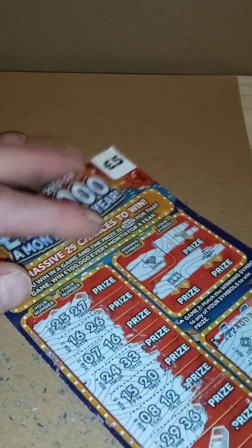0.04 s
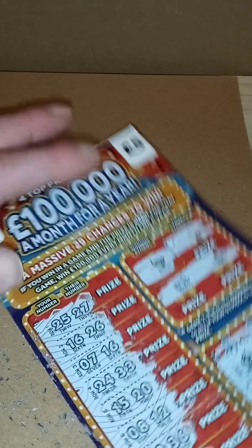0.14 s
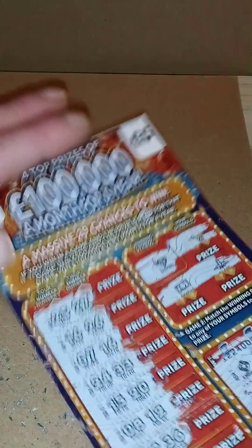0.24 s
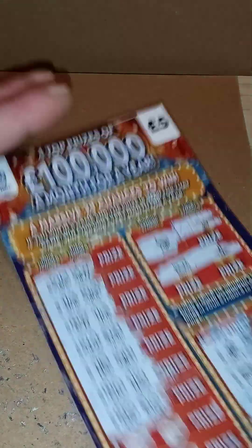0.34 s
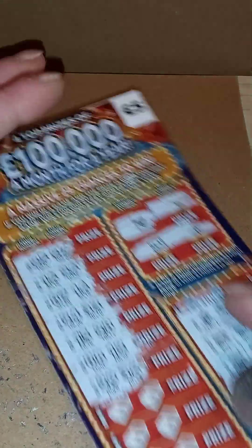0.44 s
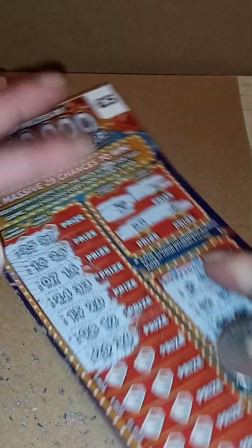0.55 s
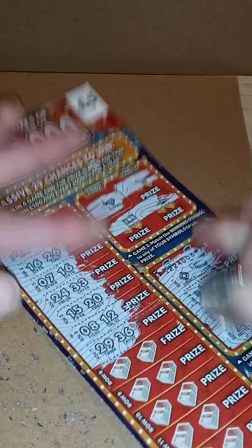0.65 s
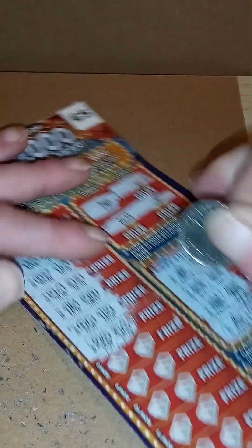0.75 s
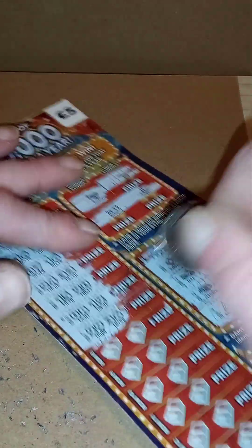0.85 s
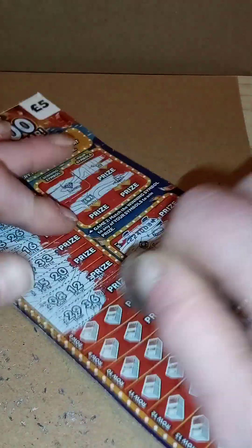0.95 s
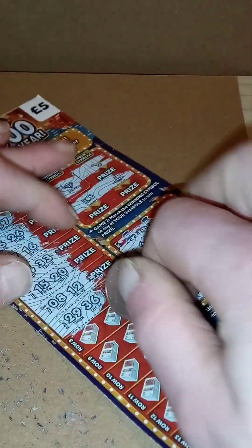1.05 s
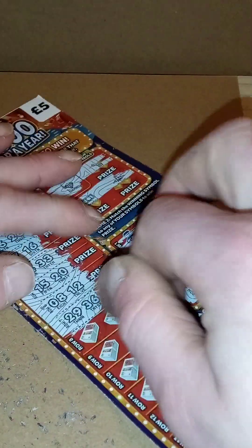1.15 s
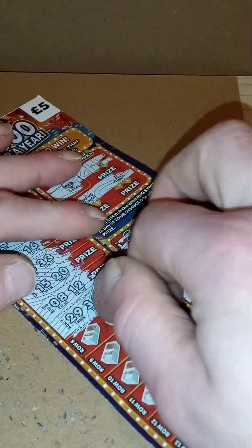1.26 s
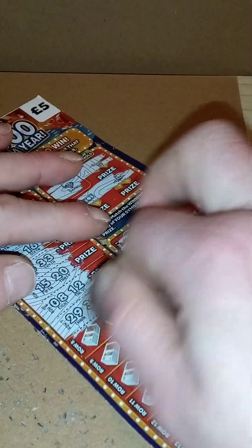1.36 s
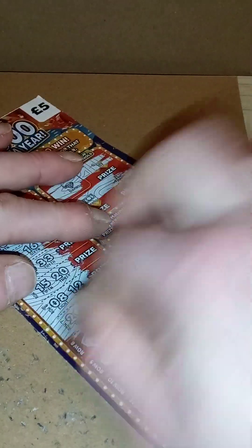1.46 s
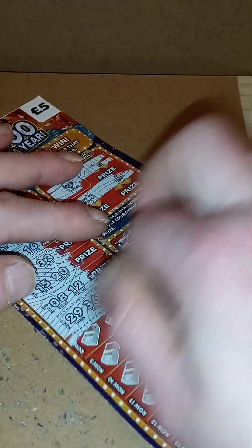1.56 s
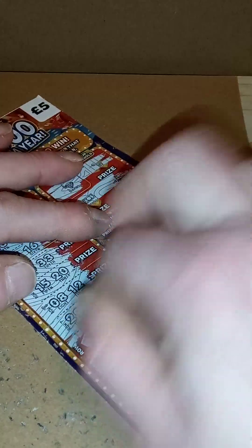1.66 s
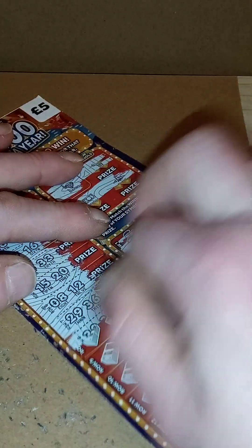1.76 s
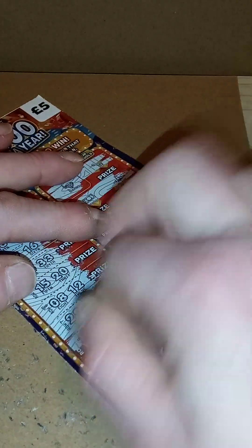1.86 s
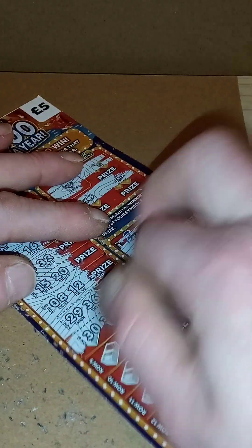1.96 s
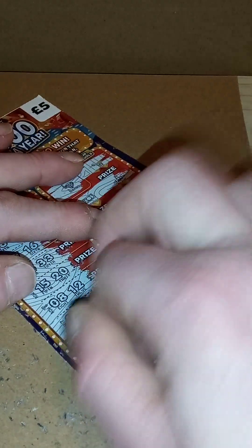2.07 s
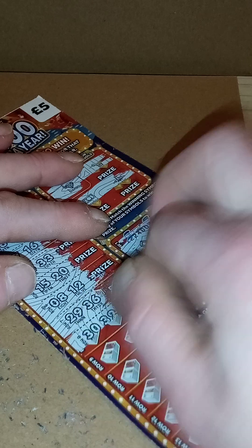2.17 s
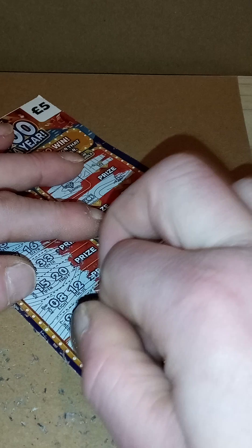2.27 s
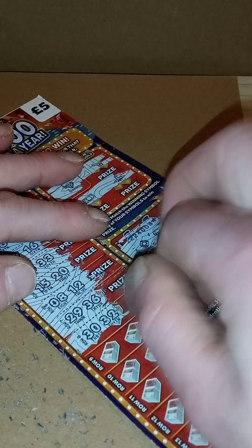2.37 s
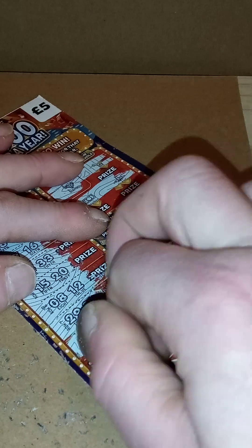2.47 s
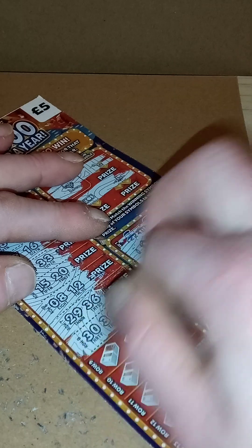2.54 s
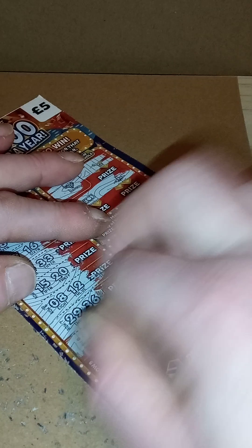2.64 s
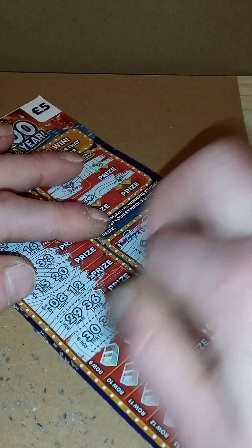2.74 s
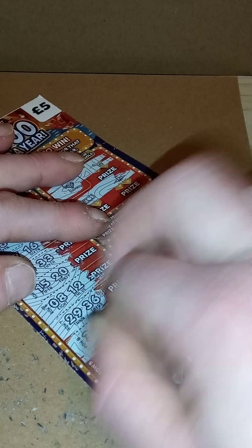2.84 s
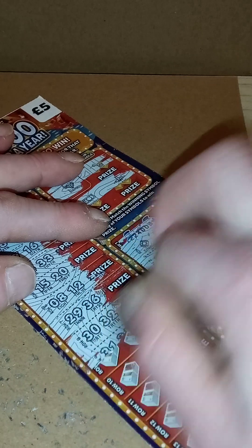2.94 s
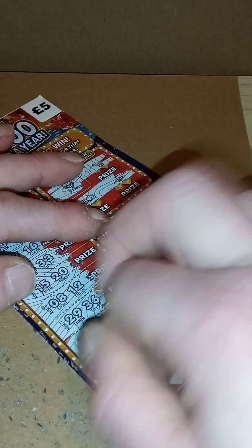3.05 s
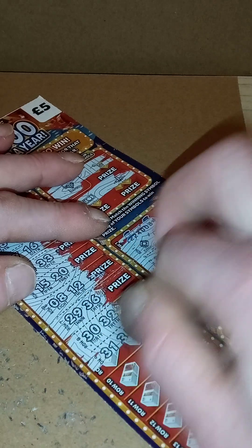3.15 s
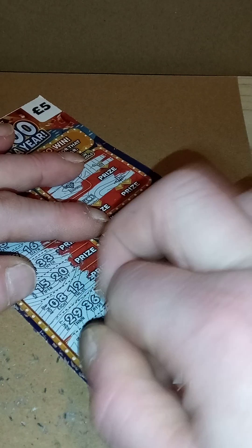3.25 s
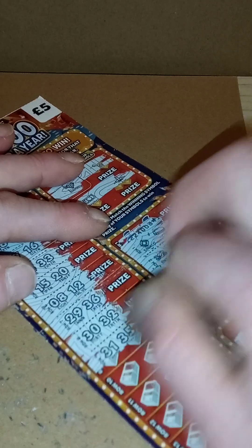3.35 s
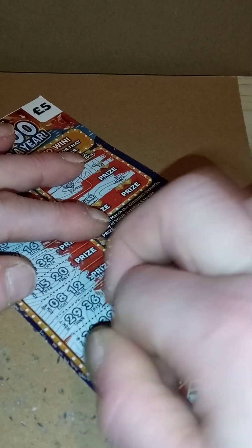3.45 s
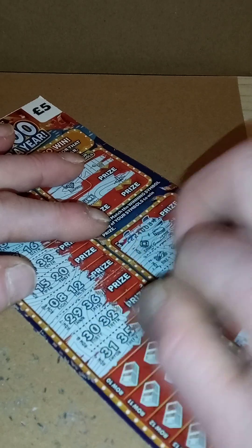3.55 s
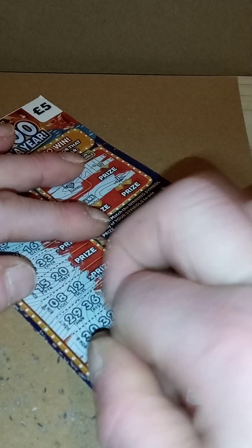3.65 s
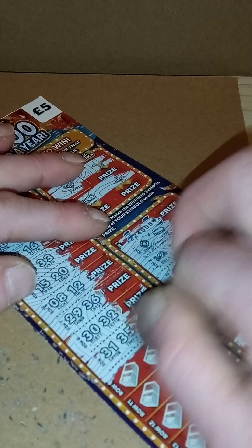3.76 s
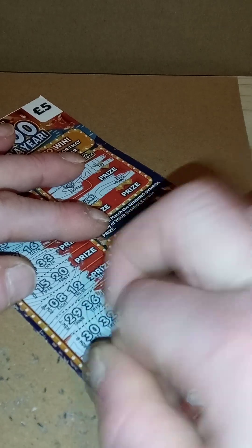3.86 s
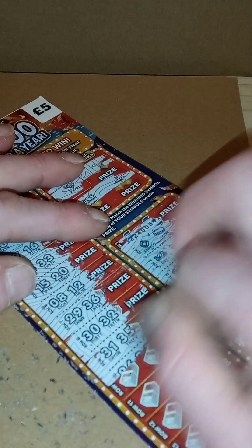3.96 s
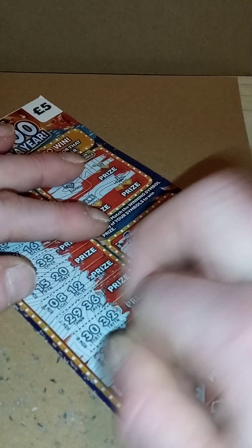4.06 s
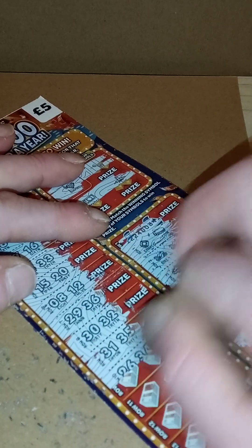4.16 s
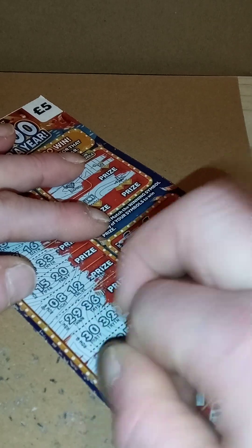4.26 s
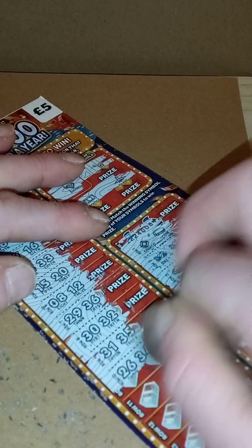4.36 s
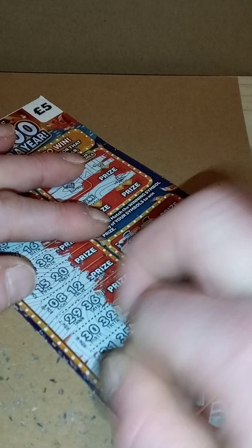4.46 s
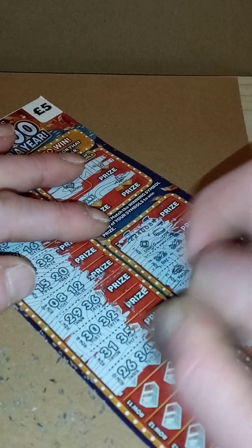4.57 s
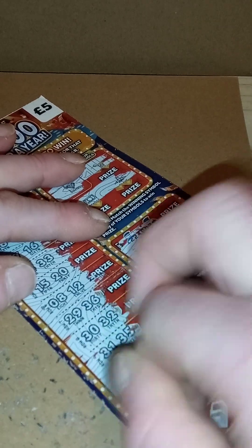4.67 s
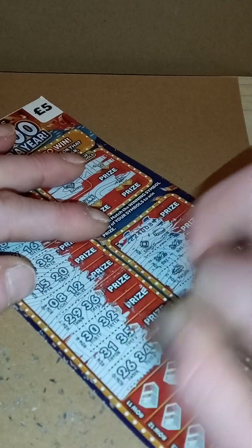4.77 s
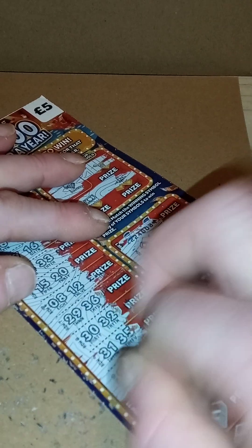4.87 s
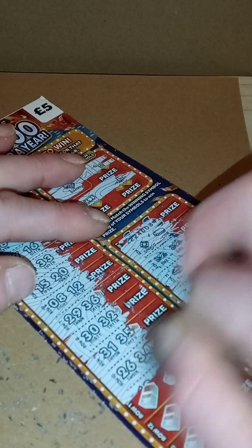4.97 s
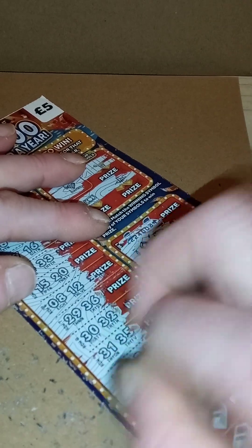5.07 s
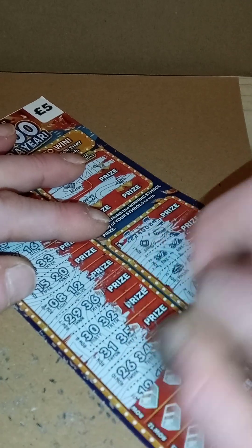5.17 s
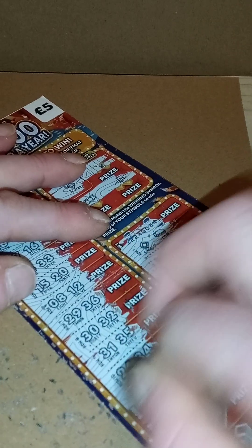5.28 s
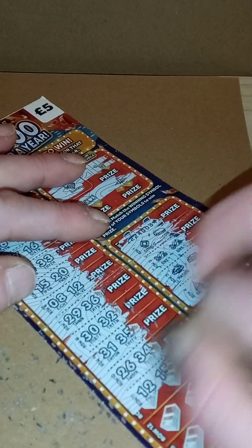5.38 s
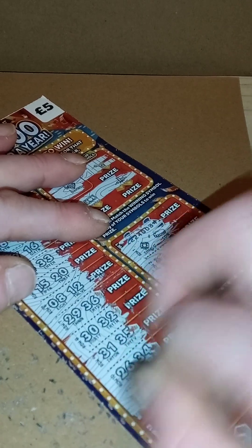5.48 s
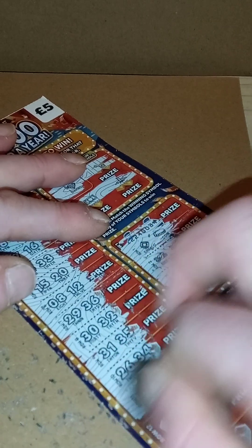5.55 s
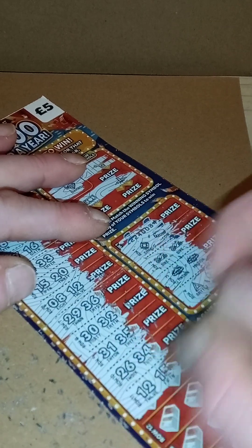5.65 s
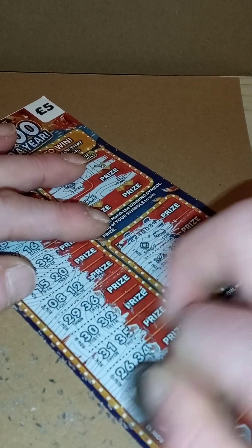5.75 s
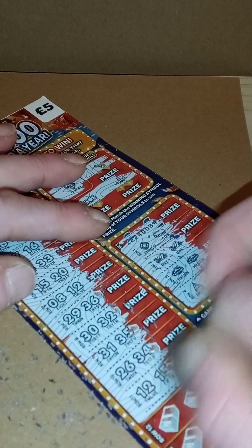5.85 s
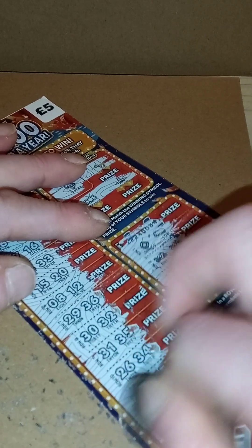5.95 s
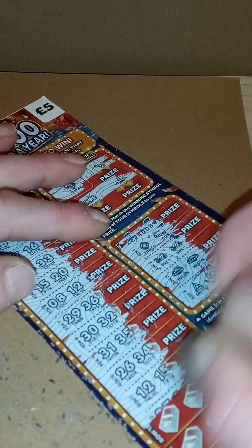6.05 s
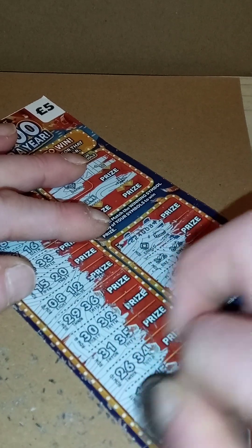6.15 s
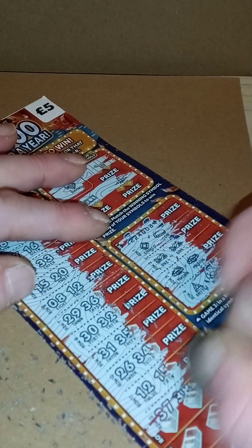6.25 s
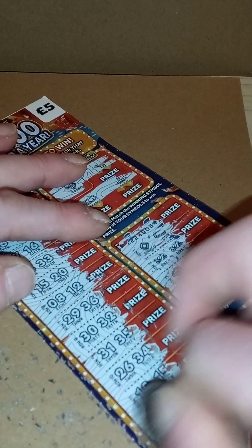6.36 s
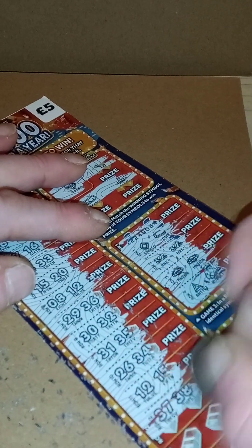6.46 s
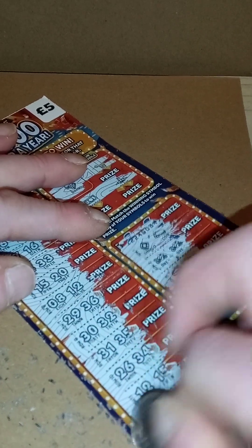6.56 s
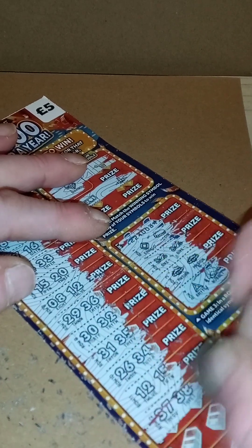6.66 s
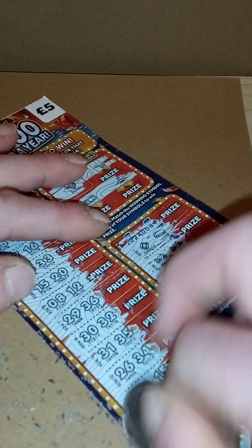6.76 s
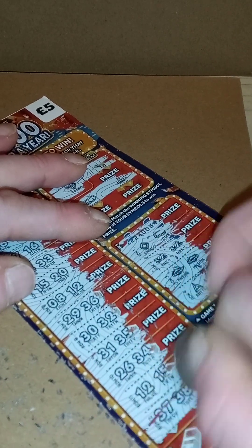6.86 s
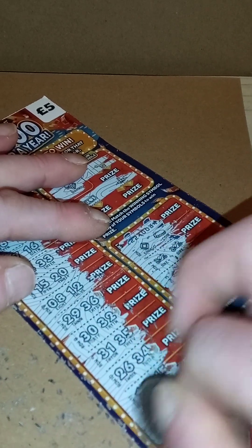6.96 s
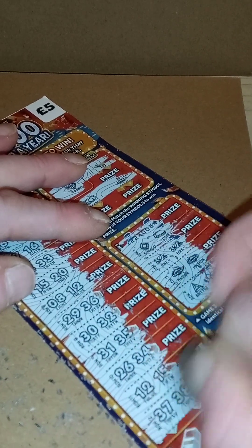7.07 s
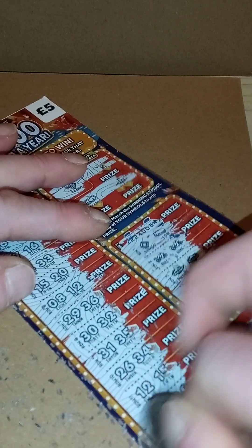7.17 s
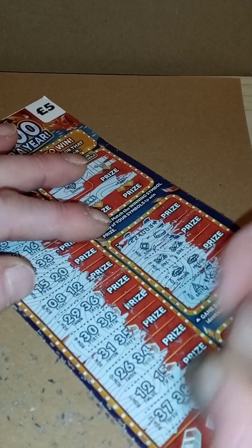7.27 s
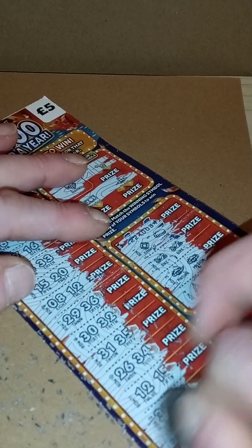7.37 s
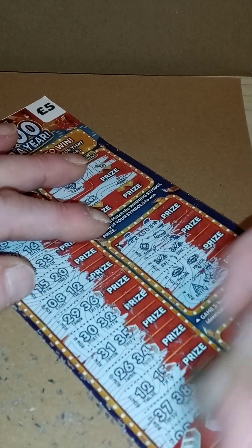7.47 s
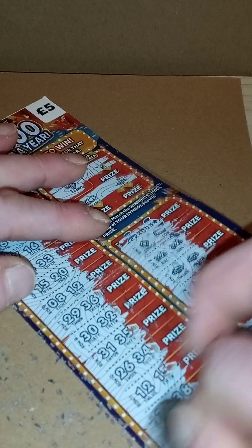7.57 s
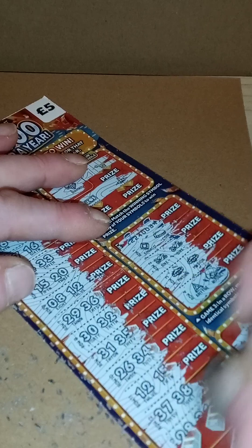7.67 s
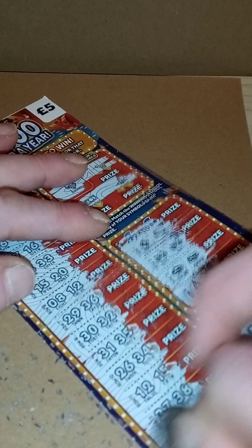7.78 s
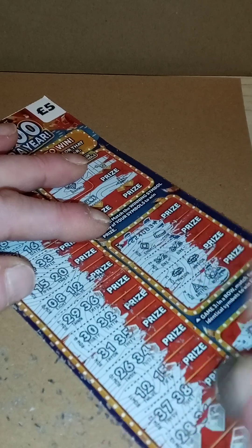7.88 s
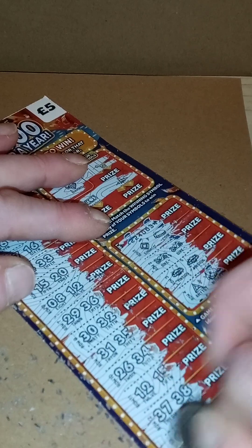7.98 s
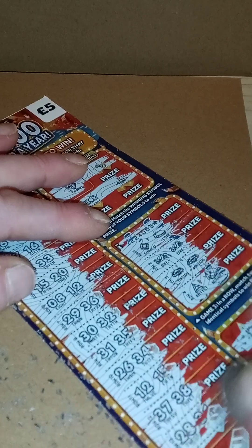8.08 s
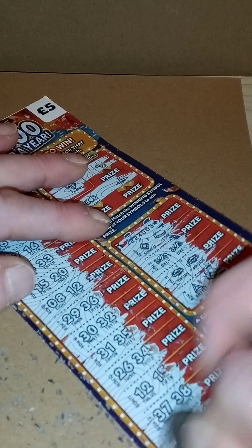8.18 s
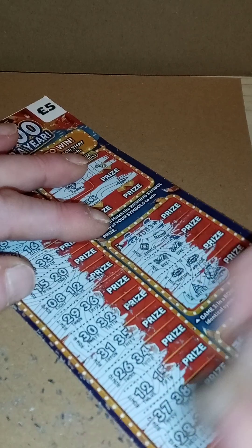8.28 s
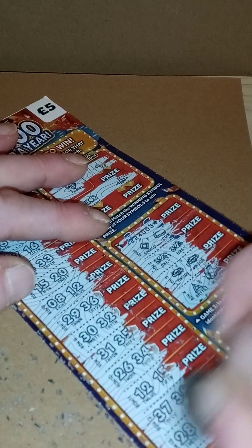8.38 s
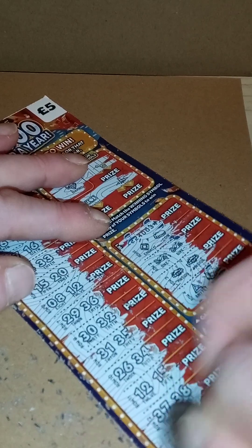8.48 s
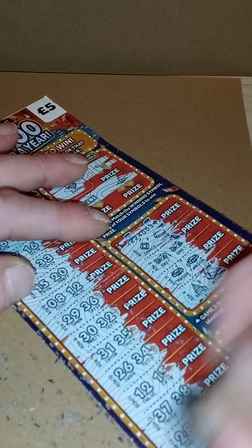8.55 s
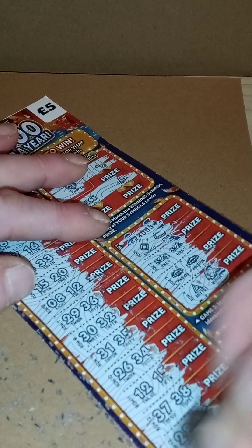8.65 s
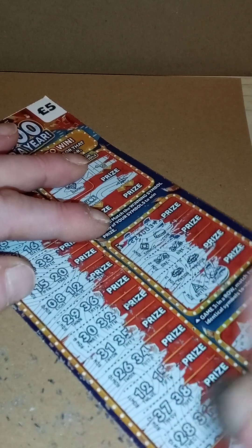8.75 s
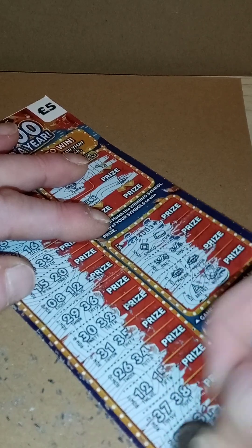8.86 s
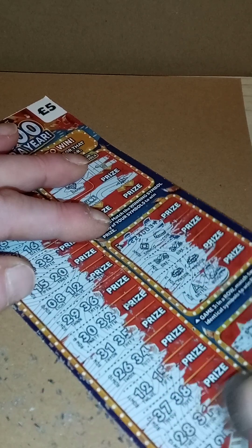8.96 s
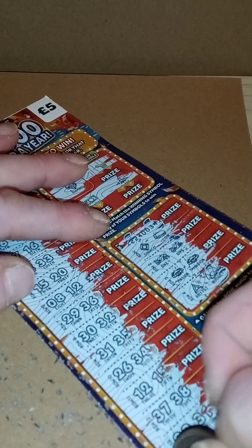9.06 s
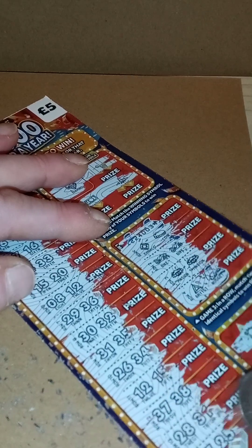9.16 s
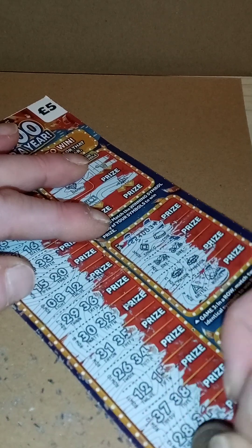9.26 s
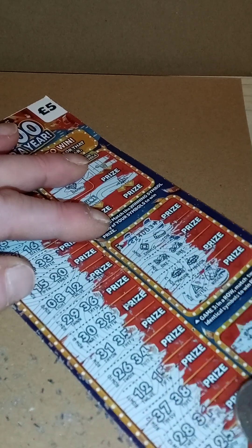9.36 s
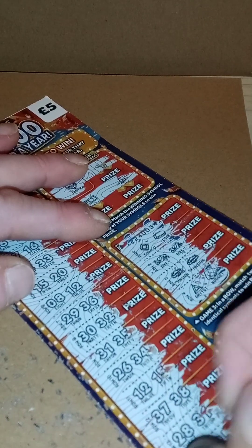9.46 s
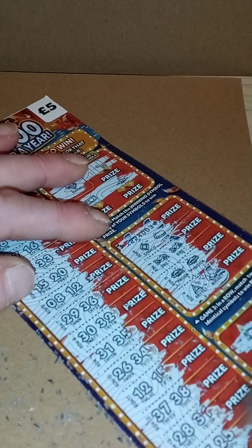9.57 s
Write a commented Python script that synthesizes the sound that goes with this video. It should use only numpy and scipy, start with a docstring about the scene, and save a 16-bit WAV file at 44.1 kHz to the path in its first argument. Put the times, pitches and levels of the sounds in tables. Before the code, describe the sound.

Close up in a small, fairly dry room, a thin card is moved on a sheet of cardboard. A short swish opens the scene, then dry ticks at about 0.2 to 0.4 s and a longer soft papery slide from 0.4 to 0.8 s, with dull low hand bumps; quieter shuffles and small clicks follow until 1.3 s. From 1.4 s a coin scrapes the card's coating in quick alternating strokes, about ten a second, each a short gritty rasp, back and out differing slightly in tone. The hand's jolts make the cardboard thud softly, with stronger hollow thumps and coin knocks near 4.0, 4.6, 5.2 and 6.0 s. The scratching weakens briefly around 7 s, then grows louder and rougher from 7.5 s, with more knocks and ticks, still going when it stops at about 9.6 s. Faint rumble and steady hush lie beneath.

```python
"""Small room, close microphone: a coin scrapes the coating off a thin card lying on a cardboard sheet.
The card is first slid about: shaped noise, with deep bumps as hands shift on the board.
Then quick strokes go to and fro: gritty noise through card resonances, rubbing in the board modes.
The hand jolts the board's low modes; the coin edge knocks on it; dry ticks come from card and coin.
Low rumble and a steady hush lie beneath."""
import sys
import numpy as np
from scipy import signal
from scipy.fft import rfft, irfft
from scipy.io import wavfile

SR = 44100
rng = np.random.default_rng(int(sys.argv[2]) if len(sys.argv) > 2 else 0)


def bounce(signal):
    """Save signal as a 16-bit WAV file at the path given by the first command-line argument."""
    frames = np.transpose(np.atleast_2d(signal))
    limited = np.clip(frames, -1, 1)
    pcm = np.round(limited * 32767).astype(np.int16)
    wavfile.write(sys.argv[1], SR, pcm)


N = 424228


def from_db(db):
    """Decibels to amplitude gain."""
    return 10 ** (np.asarray(db) / 20)


def rms_one(x):
    """Scale to rms 1."""
    return x / np.sqrt(np.mean(x ** 2) + 1e-20)


def in_time(rows):
    """Interpolate each column of a time curve to one value per sample."""
    t_s, *columns = np.transpose(rows)
    return [np.interp(np.arange(N) / SR, t_s, column) for column in columns]


def drift(rate_hz):
    """Slow random wander of rms 1: noise through a double one-pole lowpass."""
    r = np.exp(-2 * np.pi * rate_hz / SR)
    noise = rng.standard_normal(N + SR)
    settled = signal.lfilter([1], [1, -2 * r, r * r], noise)[SR:]
    return rms_one(settled)


def ring(force, hz, t60_s):
    """Two-pole mode: a unit click starts a decaying sine of initial height 1."""
    r = from_db(-60 / (t60_s * SR))
    w = 2 * np.pi * hz / SR
    return signal.lfilter([0, np.sin(w)], [1, -2 * r * np.cos(w), r * r], force + 1e-18)


def resonance(x, hz, width_hz):
    """Two-pole bandpass with a peak gain of about 1."""
    r = np.exp(-np.pi * width_hz / SR)
    zeros = np.array([1, 0, -1]) * (1 - r * r) / 2
    return signal.lfilter(zeros, [1, -2 * r * np.cos(2 * np.pi * hz / SR), r * r], x)


def coloured(x, points):
    """Impose a spectrum of (f/Hz, level/dB) points, then scale to rms 1."""
    hz = np.maximum(np.fft.rfftfreq(N, 1 / SR), 1)
    point_hz, point_db = np.array(points).T
    shape_db = np.interp(np.log(hz), np.log(point_hz), point_db)
    return rms_one(irfft(rfft(x) * from_db(shape_db), N))


def grit(per_s, spread_db, smooth):
    """Tiny tears: dense clicks of uneven size over smooth friction noise, rms 1."""
    sizes = from_db(spread_db * np.minimum(rng.exponential(1, N), 5)) * rng.choice([-1, 1], N)
    clicks = rms_one(sizes * (rng.random(N) < per_s / SR))
    return rms_one(clicks + smooth * rng.standard_normal(N))


def sweep(t_s, length_s, peak, softness, release):
    """First sample and shape of a movement that speeds up to its peak and slows to a halt."""
    at = round(t_s * SR)
    progress = np.linspace(0, 1, round(length_s * SR))
    phase = np.interp(progress, [0, np.clip(peak, .08, .92), 1], [0, np.pi / 2, np.pi])
    roundness = np.where(phase < np.pi / 2, max(softness, .05), release)
    return at, (np.abs(np.sin(phase)) ** roundness)[:N - at]


# coin strokes, back and out in turn, back first: t/s, length/s, relative level/dB
STROKE_TABLE = [(1.414, 0.039, -52.5), (1.494, 0.043, -44.5), (1.552, 0.054, -48), (1.654, 0.071, -46.5),
                (1.756, 0.056, -48.5), (1.862, 0.069, -47.5), (1.953, .057, -48), (2.058, 0.044, -43.5),
                (2.148, 0.058, -57), (2.258, 0.054, -47.5), (2.334, 0.055, -48), (2.439, 0.052, -44.5),
                (2.532, 0.055, -48.5), (2.638, 0.054, -45.5), (2.726, 0.058, -48), (2.838, 0.07, -44.5),
                (2.935, 0.049, -45.5), (3.039, 0.065, -44.5), (3.125, 0.051, -47), (3.235, 0.067, -46),
                (3.323, 0.051, -52.5), (3.438, .069, -47), (3.524, 0.054, -48.5), (3.641, 0.06, -44.5),
                (3.723, .049, -45.5), (3.839, 0.06, -45.5), (3.925, 0.052, -50), (4.038, 0.071, -45),
                (4.142, 0.055, -48.5), (4.253, 0.059, -49.5), (4.337, .048, -49.5), (4.449, 0.063, -48),
                (4.542, 0.065, -57.5), (4.646, 0.071, -45.5), (4.735, 0.063, -50), (4.86, 0.06, -47),
                (4.946, .056, -48.5), (5.069, 0.057, -46), (5.148, 0.054, -48), (5.257, 0.065, -48.5),
                (5.352, 0.062, -51.5), (5.471, 0.063, -45.5), (5.561, 0.063, -50.5), (5.679, 0.061, -45),
                (5.771, 0.048, -47), (5.885, 0.062, -46), (5.975, 0.051, -48.5), (6.083, 0.063, -47.5),
                (6.178, 0.063, -51), (6.296, .062, -44), (6.381, 0.06, -51.5), (6.495, 0.071, -45.5),
                (6.589, 0.06, -50.5), (6.701, 0.066, -46), (6.791, 0.058, -49.5), (6.867, 0.097, -53),
                (6.994, 0.058, -52.5), (7.098, 0.079, -55.5), (7.199, 0.058, -57), (7.3, 0.062, -46),
                (7.384, 0.068, -47.5), (7.494, 0.063, -44.5), (7.583, 0.056, -45.5), (7.703, 0.055, -46.5),
                (7.793, 0.061, -43.5), (7.896, 0.067, -43.5), (8.002, 0.066, -43), (8.117, 0.061, -41),
                (8.204, 0.056, -43), (8.315, 0.053, -42.5), (8.395, 0.048, -48), (8.494, 0.065, -47),
                (8.576, 0.052, -51.5), (8.665, 0.07, -45.5), (8.754, 0.044, -41), (8.847, .048, -47),
                (8.93, 0.049, -41.5), (9.036, 0.057, -41.5), (9.12, 0.051, -40), (9.227, 0.06, -40.5),
                (9.315, 0.065, -39.5), (9.422, 0.057, -41), (9.51, 0.064, -38.5), (9.606, 0.012, -41.5)]
# back, out: speed peak (0-1), start softness, stop softness (exponents), board weight/dB, dullness/dB
STROKE_DIRECTIONS = [(.4, 0.59, 0.69, -52.5, -3), (.62, 0.61, 0.47, -60, 3)]
# coin position along the card: t/s, place (0 middle, 1 free end)
COIN_PLACE = [(0, 0.36), (1.4, 0.16), (4, 0.052), (6.8, 0.067), (7.6, 0.32), (8.6, 0.67), (9.6, 0.64)]
# how hard the hand bears down: t/s, change of board weight/dB
HAND_BEARING = [(1.4, -4), (2.2, 1.5), (3.1, -1), (3.7, -1.5), (4.6, 1), (5.2, 0), (6.1, 1.5), (6.9, 0.5),
                (7.4, 1), (7.9, 3), (8.5, -0.5), (9.1, 0.5), (9.6, -4)]
PEAK_SPREAD, WEIGHT_SPREAD_DB, DULL_SPREAD_DB = 0.14, 1.64, 1.7  # stroke to stroke
BACK_DULLS_DB = 7  # times place: back strokes dull toward the free end
WEIGHT_LAG_S = 0.0071


def strokes(edge):
    """Coin pressure on card and board, and dullness; each stroke is widened by edge at both ends."""
    on_card, on_board, dull_db = np.zeros((3, N))
    place, = in_time(COIN_PLACE)
    chances = rng.standard_normal((len(STROKE_TABLE), 3))
    for k, ((t_s, length_s, level_db), chance) in enumerate(zip(STROKE_TABLE, chances)):
        peak, softness, release, weight_db, dullness_db = STROKE_DIRECTIONS[k % 2]
        peak = peak + PEAK_SPREAD * chance[0]
        at, shape = sweep(t_s - edge * length_s, length_s * (1 + 2 * edge), peak, softness, release)
        on_card[at:at + len(shape)] += from_db(level_db) * shape
        on_board[at:at + len(shape)] += from_db(weight_db + WEIGHT_SPREAD_DB * chance[1]) * shape
        dull_db[at:] = dullness_db + DULL_SPREAD_DB * chance[2]
        if k % 2 == 0:
            dull_db[at:] += BACK_DULLS_DB * place[at]
    # the hand's weight reaches the board a little after the coin bites
    r = np.exp(-1 / (WEIGHT_LAG_S * SR))
    bearing_db, = in_time(HAND_BEARING)
    return on_card, signal.lfilter([1 - r], [1, -r], on_board * from_db(bearing_db)), dull_db


# card resonances: f/Hz, width/Hz, relative level at middle/dB, at end/dB, dullness response (dB per dB)
CARD_RESONANCES = [(1356, 92, -12, -18, 0.72), (1650, 187, -11, -9, .5), (1970, 77, -13, -8, 0.83),
                   (2337, 257, -3.5, -6.5, -0.51), (2700, 150, -5.5, 5, -0.86),
                   (3050, 496, -5.5, -9.5, -0.52), (4094, 300, -4, -1.1, -0.8),
                   (4890, 460, -0.5, -9.5, -1.3), (5410, 515, 0, -13, -1.28), (6415, 586, -5, -7.5, -0.7),
                   (6446, 280, -7.5, -8, -0.53), (8480, 1200, -1, -8.5, -0.82)]


def card(pressure, dull_db):
    """Torn coating excites the card's resonances, each flickering on its own."""
    force = pressure * from_db(2.62 * drift(35)) * grit(per_s=5000, spread_db=3, smooth=1)
    place, = in_time(COIN_PLACE)
    out = np.zeros(N)
    for k, (hz, width_hz, middle_db, end_db, response) in enumerate(CARD_RESONANCES):
        # a flatter coin favours the low resonances
        level_db = middle_db + (end_db - middle_db) * place + response * dull_db
        level_db = level_db + 1.75 * drift(27)
        out += (-1) ** k * from_db(level_db) * resonance(force, hz, width_hz)
    return from_db(13) * out


# cardboard modes, low to high: f/Hz, relative level/dB, t60/s (free of the hand)
BOARD_MODES = [(118.2, -4.5, 0.18), (221.7, -2, 0.19), (320.4, -15.5, 0.12), (394, -16, 0.042),
               (539.6, -9.5, 0.11), (660, -16.5, 0.013), (815, 3, 0.04), (918, 1, 0.03), (1045, 6, 0.026),
               (1131, -2.5, 0.021), (1414, -9, 0.044), (1614, -9, 0.057), (1918, -6, 0.033),
               (2225, -3, 0.031), (3100, -13.5, 0.008)]
# coin edge on board: t/s, relative level/dB, contact/ms (rise to greatest force, at least 0.02)
COIN_KNOCKS = [(.333, -25.5, 0.5), (1.6, -30.5, .11), (2.193, -35, 0.1), (2.399, -28.5, 0.13),
               (3.9904, -11, 0.13), (4.601, -15, 0.016), (5.219, -13.5, .14), (6.04, -18, 0.1),
               (6.662, -16, 0.18), (6.866, -17, 0.15), (7.652, -14.5, 0.026), (7.858, -15, .04),
               (8.022, -25, 0.077), (8.223, -24.5, 0.4), (8.764, -12, 0.32), (8.951, -17, 0.4),
               (9.146, -15, 0.28), (9.359, -15.5, 0.45)]
CRACK_DB, KNOCK_SPREAD_DB = -25, 2.5


def board(pressure):
    """Rubbing and knocks ring the cardboard modes; each knock adds a short noise crack."""
    rub = from_db(-27.5) * pressure * from_db(3.4 * drift(45))
    rub = rub * grit(per_s=1500, spread_db=2.5, smooth=0.71)
    knocks, cracks = np.zeros((2, N))
    time_s = np.arange(400) / SR
    noises = rng.standard_normal((len(COIN_KNOCKS), 400))
    for (t_s, level_db, contact_ms), noise in zip(COIN_KNOCKS, noises):
        at = round(t_s * SR)
        blow = time_s * np.exp(-1000 * time_s / max(contact_ms, .02))
        knocks[at:][:400] -= from_db(level_db - 18) * blow / blow.sum()
        cracks[at:][:400] += from_db(level_db + CRACK_DB) * noise * np.exp(-time_s / 0.0018)
    # a light coin hardly moves the two bending modes of the whole sheet
    knock_shares = [from_db(-21), from_db(-20)] + [1] * (len(BOARD_MODES) - 2)
    out = cracks
    for share, (hz, level_db, t60_s) in zip(knock_shares, BOARD_MODES):
        # as the coin travels each mode is driven now harder, now softer
        rub_drive = from_db(3.15 * drift(12.8)) * rub
        knock_drive = share * from_db(KNOCK_SPREAD_DB * drift(3.4)) * knocks
        out = out + from_db(level_db) * ring(rub_drive + knock_drive, hz, t60_s)
    return out


# hand jolts the board, mostly where a back stroke ends: t/s, relative level/dB
HAND_JOLTS = [(.027, -45.5), (.333, -59), (.533, -61.5), (0.631, -55.5), (0.723, -56.5), (1.08, -62),
              (1.5, -51), (1.598, -39.5), (1.819, -47.5), (2.009, -46), (2.194, -39.5), (2.359, -50.5),
              (2.553, -43), (2.785, -34), (2.989, -41), (3.186, -40.5), (3.361, -44.5), (3.566, -37.5),
              (3.773, -39), (3.992, -28), (4.189, -54), (4.385, -42), (4.604, -31.5), (4.8, -40.5),
              (5, -48), (5.217, -29), (5.419, -38.5), (5.613, -39), (5.829, -40), (6.038, -29),
              (6.242, -49), (6.435, -44), (6.662, -29.5), (6.867, -31.5), (7.037, -48.5), (7.242, -39.5),
              (7.436, -48.5), (7.651, -32.5), (7.856, -27), (8.006, -36.5), (8.22, -37.5), (8.447, -43),
              (8.621, -43.5), (8.789, -38), (8.945, -41.5), (9.174, -44.5), (9.351, -49), (9.552, -43)]
# balance as the hand moves over the board: t/s, second over lowest bending mode/dB
UPPER_MODE = [(0, -1), (.6, 23.5), (1.5, -4), (2.6, 13.5), (3.25, 1.5), (4.6, 5), (5.9, 1.5), (6.35, -7),
              (8, 1), (9.3, -6)]
UPPER_SPREAD_DB, HAND_DAMPING = 3.5, 0.88  # the resting hand scales t60
SET_OFF_DB, SET_OFF_SPREAD_DB = -53, 2  # faint jolt as each out stroke sets off


def jolts(rise_s, detune, shudder_db):
    """A soft push swells into the three lowest modes, each detuned at random; a shudder surrounds it."""
    out, shaking = np.zeros(N + SR), np.zeros(N)
    time_s = np.arange(round(.2 * SR)) / SR
    outs = STROKE_TABLE[1::2]
    set_offs = [(t_s, SET_OFF_DB + SET_OFF_SPREAD_DB * chance)
                for (t_s, *_), chance in zip(outs, rng.standard_normal(len(outs)))]
    pushes = list(HAND_JOLTS) + set_offs
    for (t_s, jolt_db), (*detunings, tilt) in zip(pushes, rng.standard_normal((len(pushes), 4))):
        at = round(t_s * SR)
        upper_db = np.interp(t_s, *np.transpose(UPPER_MODE)) + UPPER_SPREAD_DB * tilt
        shaking[at] = from_db(jolt_db + shudder_db)
        shares_db = [-upper_db / 2, upper_db / 2, upper_db / 2 - 28.5]
        for (hz, _, t60_s), share_db, detuning in zip(BOARD_MODES, shares_db, detunings):
            rise = 1 - np.exp(-(time_s / rise_s) ** 2)
            decay = from_db(-60 * time_s / (HAND_DAMPING * t60_s))
            tone = np.sin(2 * np.pi * hz * (1 + detune * detuning) * time_s)
            out[at:][:len(time_s)] += from_db(jolt_db + share_db) * rise * decay * tone
    shaking = signal.fftconvolve(shaking, np.hanning(round(.07 * SR)), "same")
    shaking = shaking * rng.standard_normal(N)
    shudder = sum(ring(shaking, hz, t60_s) for hz, _, t60_s in BOARD_MODES[:4])
    return from_db(-2) * out[:N] + shudder


# dry ticks of card edge and coin: t/s, peak level/dB, f/Hz
DRY_TICKS = [(0.171, -27.5, 4570), (0.2149, -16.5, 2890), (0.3344, -21.5, 2490), (0.358, -14, 3440),
             (0.629, -28, 3140), (0.7957, -29, 2430), (0.865, -30, 6300), (1.0774, -23, 2930),
             (1.101, -39, 2250), (1.2175, -34.5, 4700), (1.3224, -36.5, 2160), (1.521, -21, 4660),
             (4.037, -25.5, 5300), (4.6463, -22.5, 2180), (6.3001, -34, 5200), (7.8067, -37, 4800),
             (8.0115, -20, 4000), (8.022, -16.5, 3830), (8.228, -20, 4930), (8.7668, -20, 2920),
             (8.9372, -20.5, 2820), (8.951, -18, 2700), (9.313, -25, 4180), (9.36, -25, 2560)]
TICK_RING_DB, TICK_WIDTH_HZ = 1, 490


def ticks():
    """A broad noise snap of a few milliseconds with a short ring at its pitch."""
    out, time_s = np.zeros(N), np.arange(900) / SR
    decay = np.exp(-time_s / 0.0012) + 0.076 * np.exp(-time_s / 0.0077)
    for (t_s, peak_db, hz), noise in zip(DRY_TICKS, rng.standard_normal((len(DRY_TICKS), 900))):
        snap = (noise + 1.8 * (time_s == 0)) * decay
        ringing = from_db(TICK_RING_DB) * resonance(snap, hz, TICK_WIDTH_HZ)
        snap = signal.lfilter([1, -.7], [2], snap) + ringing
        out[round(t_s * SR):][:900] += from_db(peak_db) * snap / np.abs(snap).max()
    return out


# card slid by the fingers: t/s, length/s, level/dB, speed peak (0-1), board share/dB, dullness/dB
CARD_SLIDES = [(0, 0.066, -43.5, 0.42, -10.5, 7), (.06, 0.24, -67, 0.58, -2, -7),
               (0.211, 0.029, -65, 0.1, -12, 12), (.255, 0.11, -69, 0.1, -21, -11),
               (0.335, 0.054, -59, 0.3, -1, 16), (0.412, 0.38, -44.5, 0.47, -25.5, 2.5),
               (0.797, 0.037, -65, 0, -12, -16.5), (0.853, 0.099, -64, 0.22, -23, -19),
               (0.95, 0.13, -58, 0.8, -20.5, -6), (1.106, 0.15, -70.5, .5, -35, -9)]
# sliding hiss spectrum: f/Hz, relative density/dB
SLIDE_SPECTRUM = [(410, -63), (700, -40), (861, -16), (1100, -16), (1270, -11), (1650, -7), (1910, -4.5),
                  (2730, -0.5), (6180, -0.5), (8250, -1), (10700, -50), (18200, -120)]
DULL_PIVOT_HZ, SLIDE_SOFTNESS = 3800, 0.66


def slide():
    """Card on cardboard: a smooth broad hiss, and the pressure it passes to the board."""
    pressure, share_db, dull_db = np.zeros((3, N))
    for t_s, length_s, level_db, peak, board_db, dullness_db in CARD_SLIDES:
        at, shape = sweep(t_s, length_s, peak, SLIDE_SOFTNESS, release=1.4)
        pressure[at:at + len(shape)] += from_db(level_db) * shape
        share_db[at:], dull_db[at:] = board_db, dullness_db
    hiss = coloured(grit(per_s=1400, spread_db=2, smooth=2.2), SLIDE_SPECTRUM)
    low = signal.sosfilt(signal.butter(2, DULL_PIVOT_HZ, fs=SR, output="sos"), hiss)
    # dullness tilts the hiss about the pivot
    hiss = from_db(dull_db / 2) * low + from_db(-dull_db / 2) * (hiss - low)
    return pressure * from_db(0.89 * drift(37)) * hiss, pressure * from_db(share_db)


# hands shifting on the board: t/s, level/dB
HAND_BUMPS = [(.012, -66), (.065, -57), (.255, -64), (.32, -65), (.345, -51), (.38, -67), (.465, -64),
              (.645, -48), (0.739, -50), (.825, -58), (.885, -56), (1.125, -61)]
BUMP_S, THUMP_HZ = .045, 78  # THUMP_HZ is scaled by 0.84-1.27 per bump
AT_REST_DB, SCRATCHING_DB = -92, -81.5


def rumble():
    """Lumpy deep noise, stepping up at the second stroke; each bump is a short deep swing."""
    band = signal.butter(2, [45, 130], "band", fs=SR, output="sos")
    time_s = np.arange(N) / SR
    level_db = np.where(time_s < STROKE_TABLE[1][0], AT_REST_DB, SCRATCHING_DB)
    level = from_db(level_db + 1.5 * drift(6.8))
    out = level * rms_one(signal.sosfilt(band, rng.standard_normal(N)))
    for (t_s, bump_db), (detuning, phase) in zip(HAND_BUMPS, rng.random((len(HAND_BUMPS), 2))):
        swell = np.clip(1 - 2 * np.abs(time_s - t_s) / BUMP_S, 0, 1) ** 2.2
        hz = THUMP_HZ * (0.84 + 0.43 * detuning)
        out += from_db(bump_db) * swell * np.sin(2 * np.pi * (hz * (time_s - t_s) + phase))
    return out


ROOM_T60_S, ROOM_DB = 0.26, -16.5


def room(x):
    """Diffuse tail: decaying noise, starting 4 ms late."""
    time_s = np.arange(round(.5 * SR)) / SR
    tail = rng.standard_normal(len(time_s)) * from_db(-60 * time_s / ROOM_T60_S) * (time_s > .004)
    tail = signal.lfilter(*signal.butter(1, 6500, fs=SR), tail)  # walls swallow the treble
    tail = tail / np.sqrt(np.sum(tail ** 2))
    return from_db(ROOM_DB) * signal.fftconvolve(x, tail)[:N]


# room and microphone background spectrum: f/Hz, relative density/dB
HUSH_SPECTRUM = [(18, -37.5), (30, -10), (279, 6.5), (591, -13), (1870, -15.5), (6330, -5), (8200, -27.5),
                 (10700, -64), (18000, -120)]
HUSH_DB = -76  # rms ahead of the microphone filters


def hush():
    """Steady background of room and microphone: shaped noise."""
    return from_db(HUSH_DB) * coloured(rng.standard_normal(N), HUSH_SPECTRUM)


def scene():
    """Card, board, hand and ticks in a small room."""
    on_card, on_board, dull_db = strokes(edge=0.098)
    hiss, sliding = slide()
    near = card(on_card, dull_db) + hiss + board(on_board + sliding) + ticks()
    near += jolts(rise_s=0.0055, detune=0.1, shudder_db=-41.5)
    # the near sounds carry little below about 78 Hz
    near = signal.sosfilt(signal.butter(4, 78, "high", fs=SR, output="sos"), near) + rumble()
    return (near + room(near) + hush())[None]


STOPBAND_HZ = 8550  # 60 dB down from here up


def record(dry):
    """The microphone drops the deep bass and rolls off the treble; the top is cut."""
    bass_cut = signal.butter(2, 40, "high", fs=SR, output="sos")
    treble_roll = signal.butter(4, 7600, fs=SR, output="sos")
    top_cut = signal.cheby2(12, 60, STOPBAND_HZ, fs=SR, output="sos")
    return signal.sosfilt(np.vstack([bass_cut, treble_roll, top_cut]), dry)


dry = scene()
out = record(dry)
bounce(out)
```